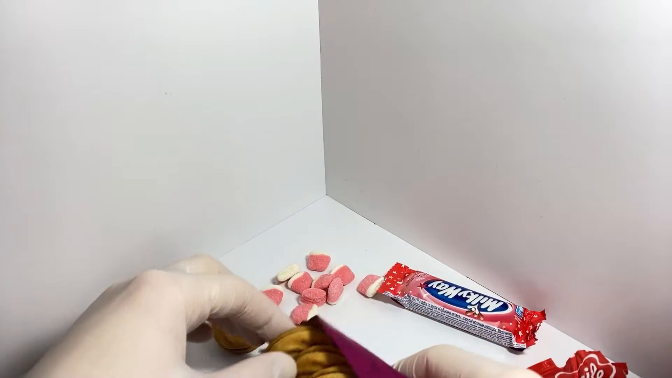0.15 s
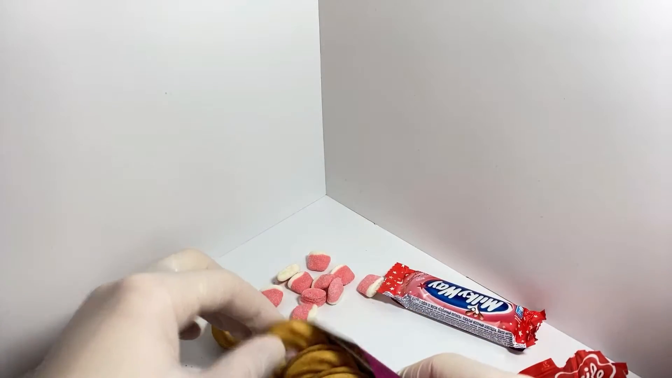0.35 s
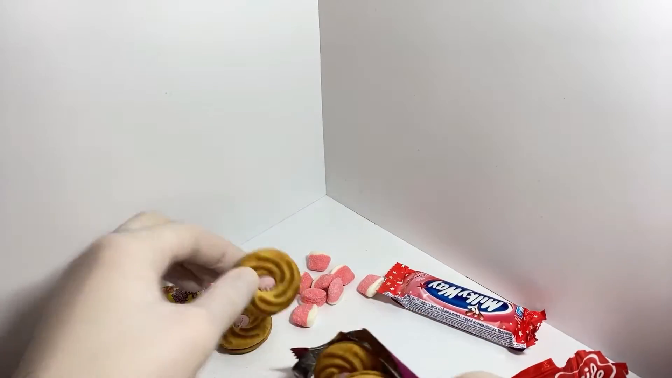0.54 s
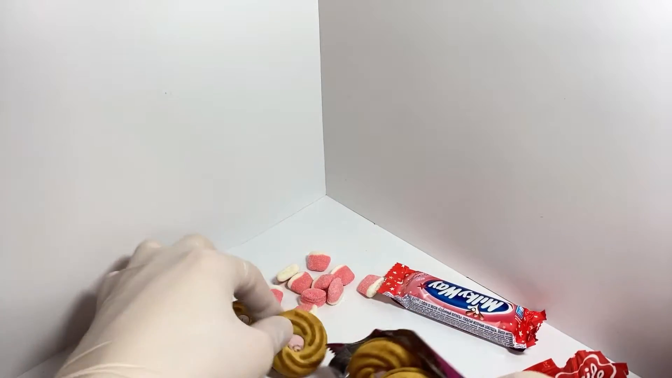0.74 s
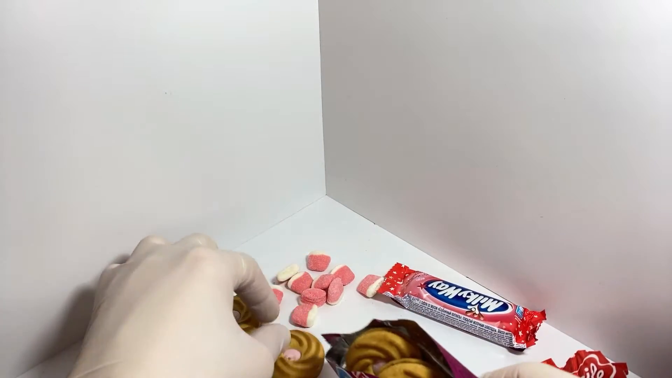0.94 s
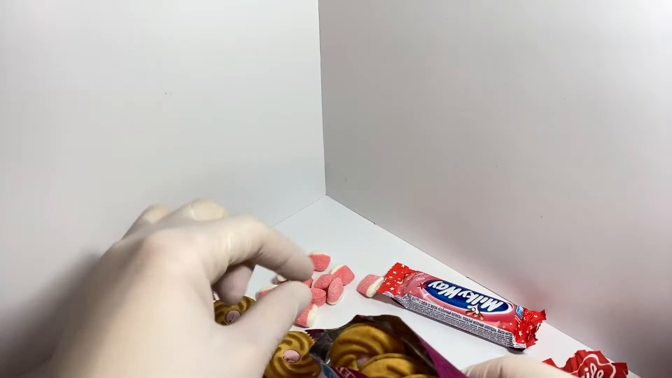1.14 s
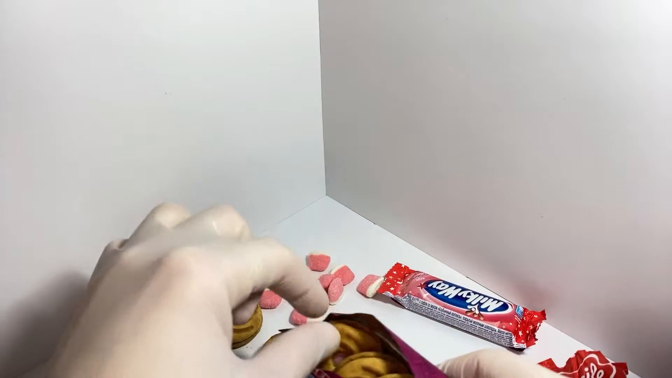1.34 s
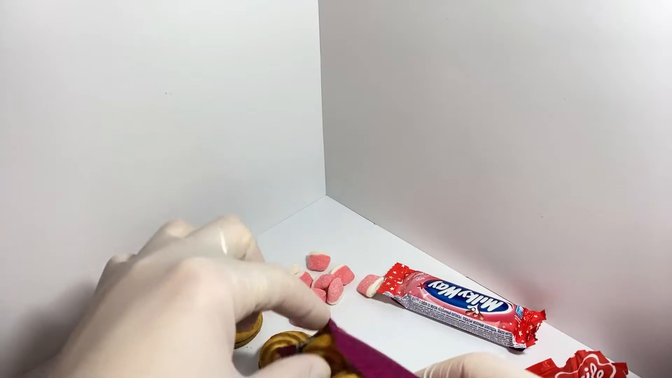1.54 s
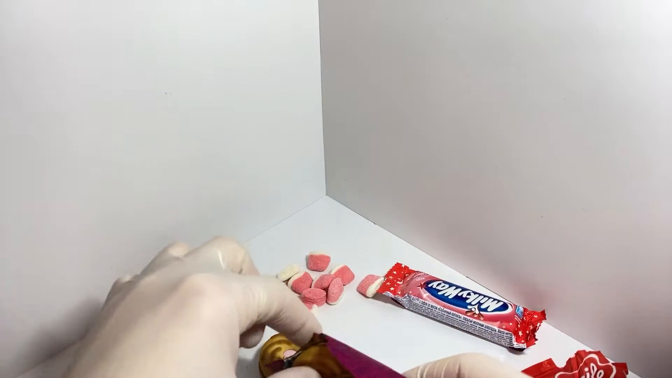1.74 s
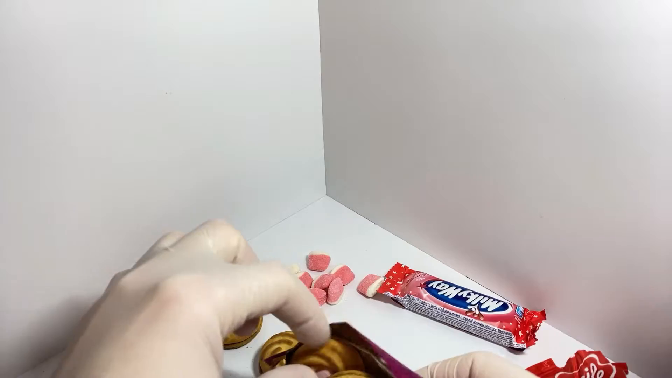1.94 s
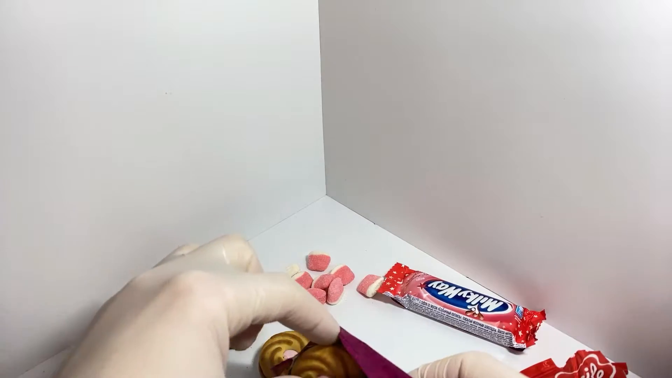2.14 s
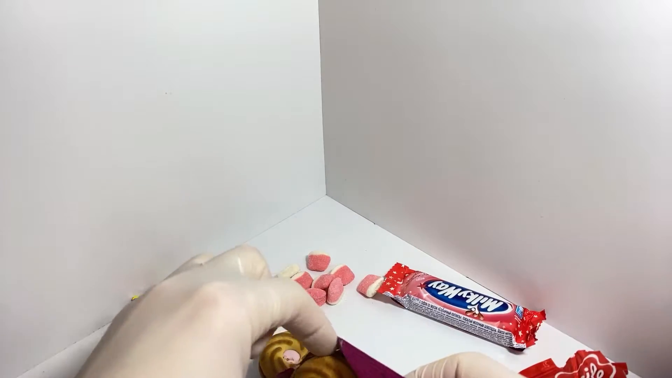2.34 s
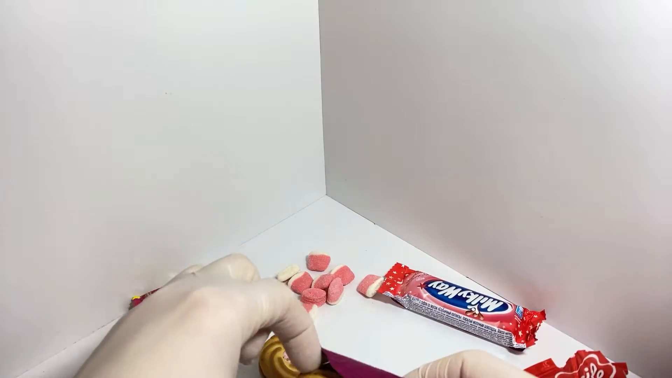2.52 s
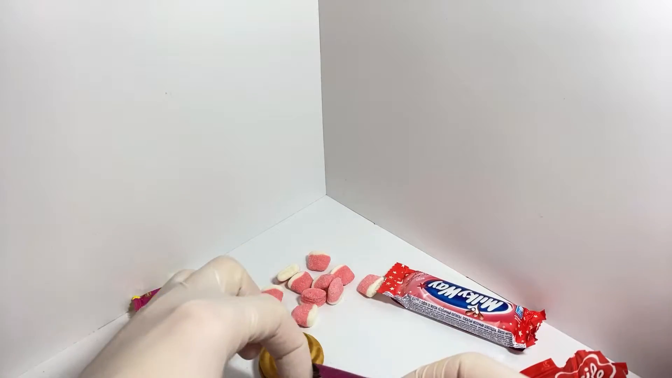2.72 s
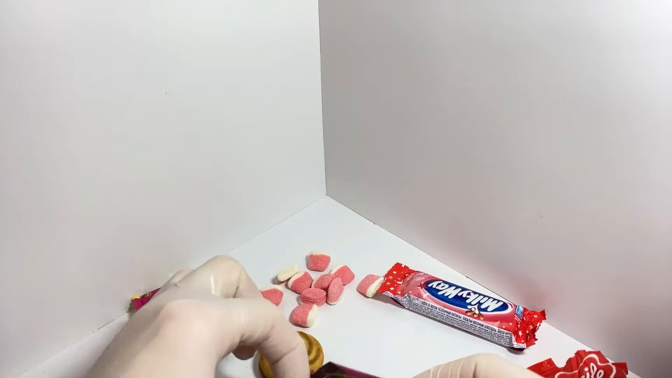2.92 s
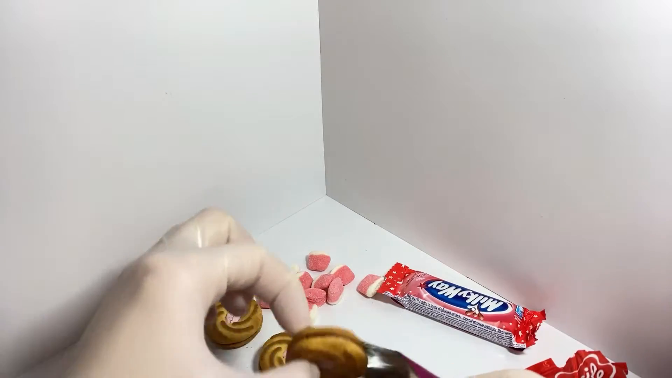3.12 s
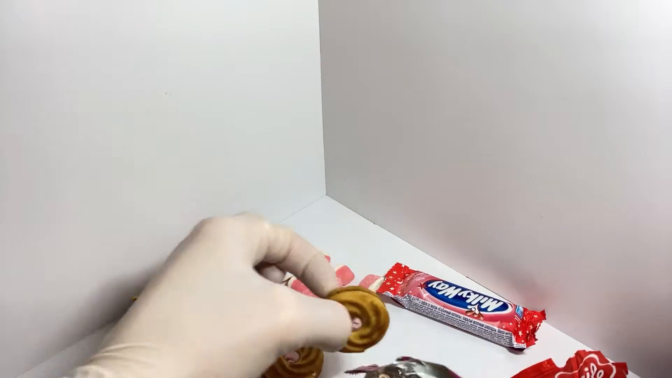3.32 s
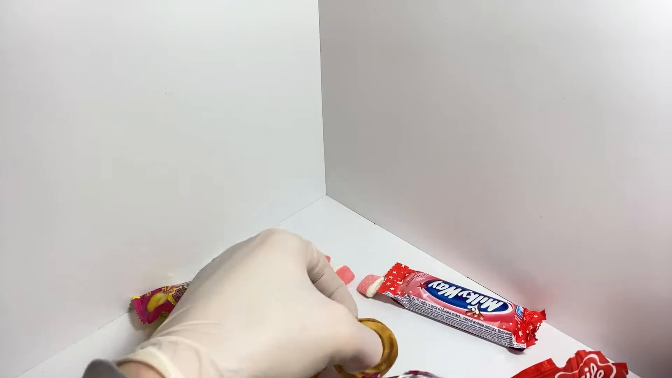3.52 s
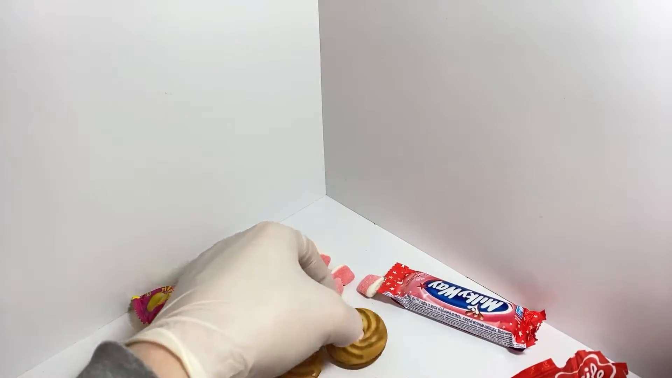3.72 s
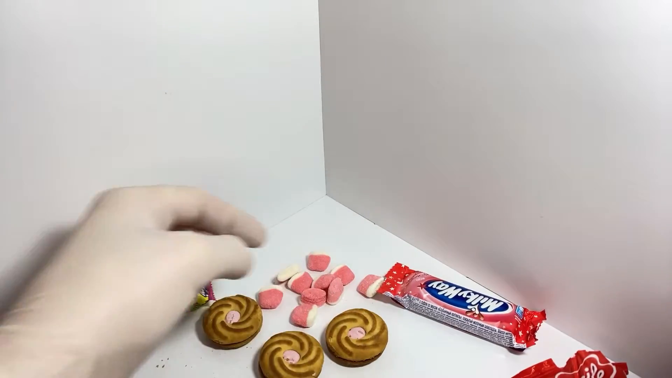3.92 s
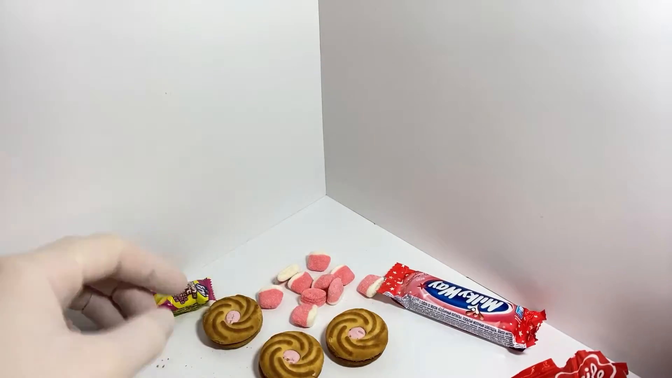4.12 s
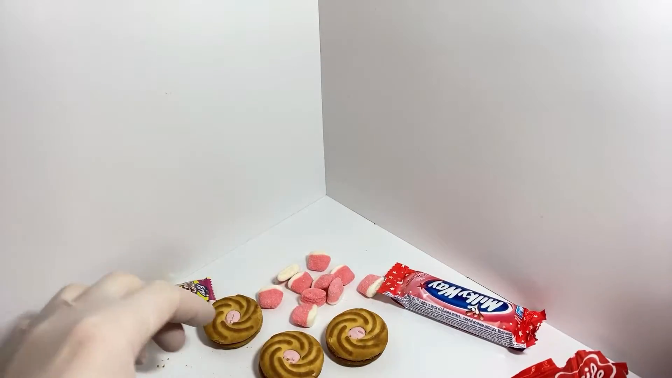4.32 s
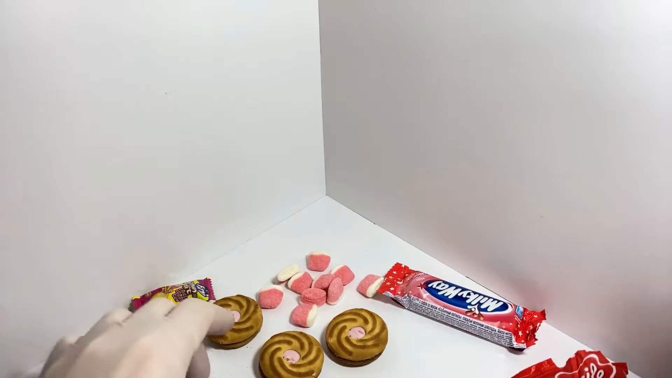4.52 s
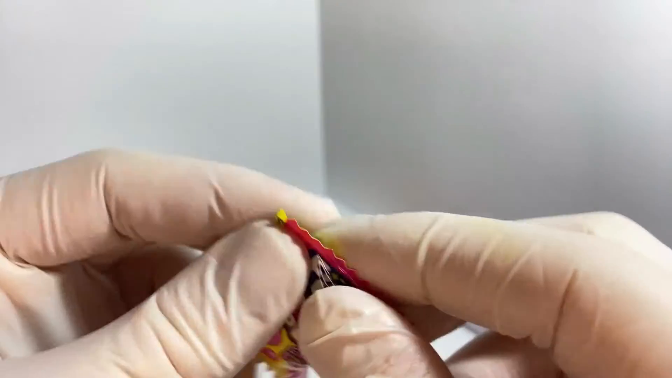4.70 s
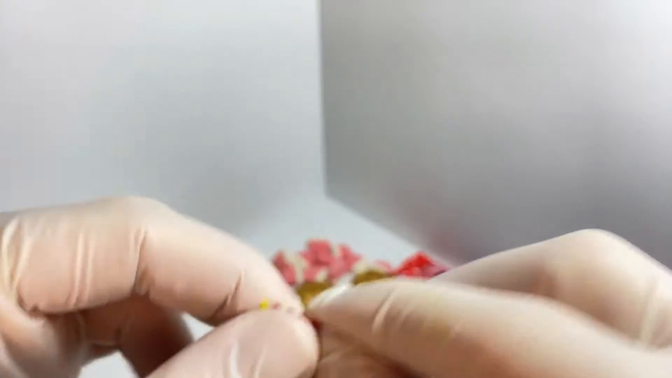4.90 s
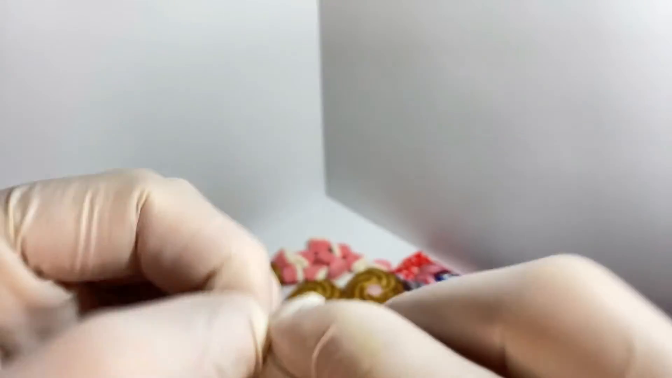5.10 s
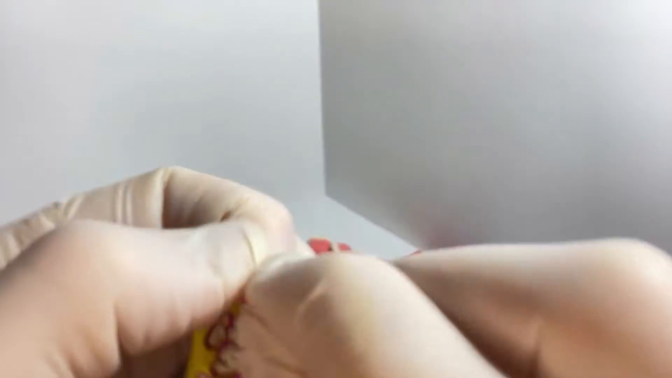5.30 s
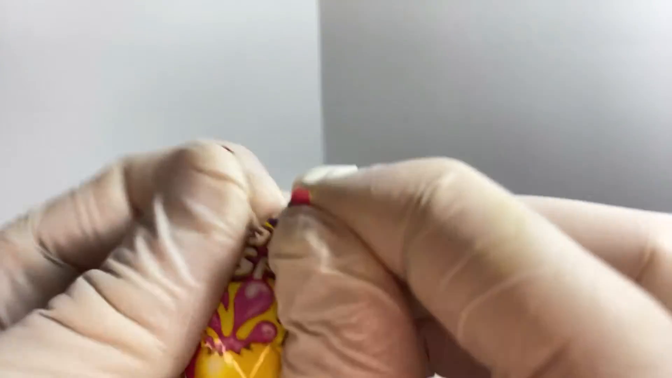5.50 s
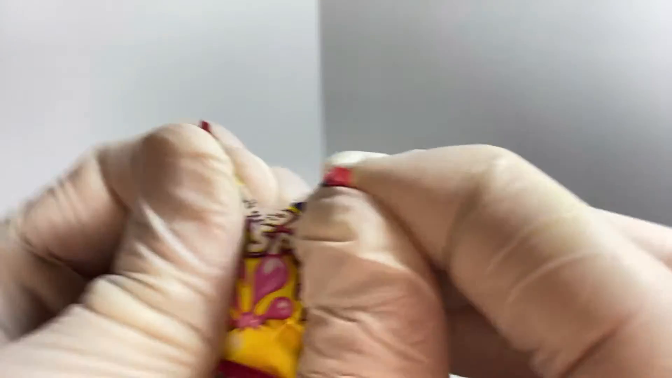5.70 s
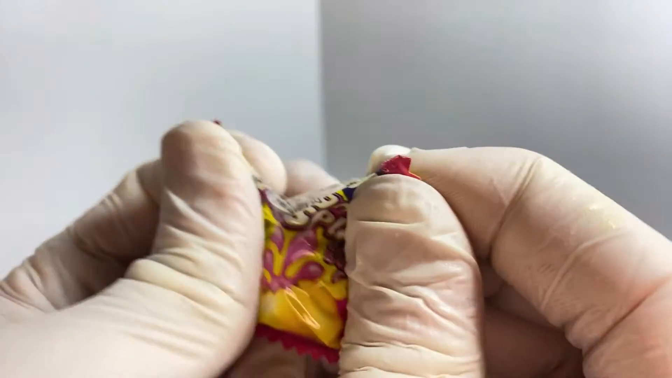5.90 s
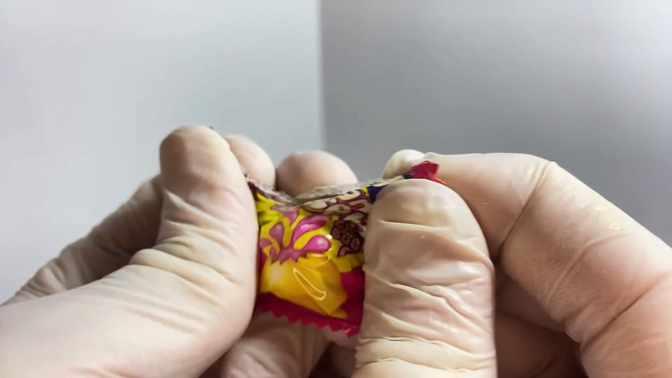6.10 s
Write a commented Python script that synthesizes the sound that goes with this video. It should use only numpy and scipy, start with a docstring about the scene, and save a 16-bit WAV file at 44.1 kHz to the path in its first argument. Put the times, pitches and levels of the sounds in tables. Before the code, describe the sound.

Irregular bursts of brittle tray crackle and biscuit scraping come first, with woody knocks as biscuits land and a second busy run of plastic snaps. A wrapped sweet taps the table, a glove brushes faintly, then a crisp foil wrapper is squeezed, briefly sings, rips and keeps crackling. Everything is close and dry-edged, with a short small-room tail over quiet steady air.

```python
"""A thin plastic tray crackles at once, close to the microphone, as gloved hands take biscuits from it.
The biscuits knock on a table; then a wrapped sweet taps it, and its foil is crinkled and torn open.
Snaps are a sharp crack and a brief ring; rubbing is random tiny slips over a smooth hiss.
Behind the hands lies a small room: its short tail on every sound, steady air and a faint hum."""
import sys
import numpy as np
from scipy import signal
from scipy.fft import rfft, irfft
from scipy.io import wavfile
from scipy.ndimage import uniform_filter1d

SR = 44100
rng = np.random.default_rng(int(sys.argv[2]) if len(sys.argv) > 2 else 0)


def wrap_up_sound(samples):
    """Save the sound to the file named by the first command line argument, as 16-bit audio."""
    columns = np.atleast_2d(samples).T
    # keep every value between -1 and 1, then stretch to whole-number steps
    tamed = np.clip(columns, -1, 1)
    steps = np.round(tamed * 32767).astype(np.int16)
    wavfile.write(sys.argv[1], SR, steps)


N = 271215

CUTOFF_HZ = 16000  # top of the room tail and of the microphone's band


def from_db(db):
    """Amplitude ratio of a level in dB."""
    return 10 ** (np.asarray(db) / 20)


def rms_one(x):
    """Scale x to an RMS of 1."""
    return x / np.sqrt(np.mean(x ** 2) + 1e-20)


def gain_in_time(rows):
    """Gain drawn through rows of (time [s], level [dB])."""
    s, db = np.transpose(rows)
    return from_db(np.interp(np.arange(N) / SR, s, db))


def at_hz(points, hz):
    """Read a table of (frequency [Hz], level [dB]) along a logarithmic frequency axis."""
    at, value = np.transpose(points)
    return np.interp(np.log(np.maximum(hz, 1)), np.log(at), value)


def causal(db):
    """Minimum-phase response with these gains: nothing sounds before its cause."""
    cepstrum = irfft(np.log(from_db(db)))
    half = len(cepstrum) // 2
    cepstrum[1:half] *= 2
    cepstrum[half + 1:] = 0
    return np.exp(rfft(cepstrum))


def coloured(x, colour, size=4096):
    """Pass x through a body with this spectrum."""
    response = irfft(causal(at_hz(colour, np.fft.rfftfreq(size, 1 / SR))))
    return signal.fftconvolve(x, response[:size // 2])[:len(x)]


def resonance(hz, centre_hz, q):
    """Response of one mode, 1 at its centre."""
    ratio = np.maximum(hz, 1) / centre_hz
    return 1 / (1 + 1j * q * (ratio - 1 / ratio))


def snaps(events, colour, crack, ring_q, t60_s, size_law, level_db, order=140, size=4096):
    """Each is one sharp crack and a quickly dying flutter, coloured by the panel that gives way.
    A larger panel rings lower and flutters longer; t60_s holds at 2 kHz."""
    out = np.zeros(N + size)
    t = np.arange(size) / SR
    hz = np.fft.rfftfreq(size, 1 / SR)
    sheen = hz ** 4 / (hz ** 4 + 7000 ** 4)  # treble shelf around 7 kHz
    fade = np.clip(2 - 4 * t / t[-1], 0, 1)
    noises = rng.standard_normal((len(events), size))
    for (s, db, ring_hz, ring_db, sheen_db), noise in zip(events, noises):
        t60 = t60_s * (2000 / ring_hz) ** size_law
        flutter = noise * from_db(-60 * (t / max(t60, 1e-3)) ** 1.4)
        force = flutter / np.linalg.norm(flutter)
        force[0] += crack
        push = rfft(force)
        # a brief blow feeds all regions of the spectrum alike
        smooth_power = uniform_filter1d(abs(push) ** 2, size=order)
        push *= causal(-10 * np.log10(smooth_power))
        panel = 1 + (from_db(ring_db) - 1) * resonance(hz, ring_hz, ring_q)
        body = causal(at_hz(colour, hz) + sheen_db * sheen)
        snap = fade * irfft(push * panel * body)
        per_5_ms = np.sqrt(SR / 200)  # levels count the snap's energy over 5 ms
        start = int(s * SR)
        out[start:start + size] += from_db(db + level_db) * snap / np.linalg.norm(snap) * per_5_ms
    return out[:N]


def faint_leads(events, lead_s, weaker_db):
    """Rows of a faint, slightly early copy of each snap."""
    return [(s - lead_s * (.5 + early), db + weaker_db, *colour)
            for (s, db, *colour), early in zip(events, rng.random(len(events)))]


def small_snaps(gain, per_s, above_db, spread_db, top_db, low_hz, high_hz, ring_db, sheen_db):
    """Rows of lesser snaps: they come at random, their level following the rubbing up to top_db."""
    rows = []
    for when, size, pitch, bright in rng.random((int(per_s * N / SR), 4)):
        db = 20 * np.log10(gain[int(when * N)]) + above_db + spread_db * (2 * size - 1)
        if db > -70:  # leave out the faintest
            ring_hz = low_hz * (high_hz / low_hz) ** pitch
            rows.append((when * N / SR, min(db, top_db), ring_hz, ring_db, sheen_db * (2 * bright - 1)))
    return rows


# Each stroke swells for this share of its length, then dies away; its ends lie this far under its peak
SWELL_SHARE, STROKE_DEPTH_DB, STROKE_ROUNDNESS = 0.52, 21.5, 1.4
GRIP_S, LET_GO_S = 0.0086, 0.037  # time constants at the two ends of a steady grip


def strokes(rows, held=()):
    """Gain of rubbing: each stroke swells and dies away, over the faint rustle of a steady grip."""
    t = np.arange(N) / SR
    power = np.full(N, 1e-14)
    for s, length, db in rows:
        away = np.maximum((s - t) / SWELL_SHARE, (t - s) / (1 - SWELL_SHARE)) / length
        near = away < 4
        power[near] += from_db(db - STROKE_DEPTH_DB * away[near] ** STROKE_ROUNDNESS) ** 2
    for start, end, db in held:
        outside = np.clip(np.maximum((start - t) / GRIP_S, (t - end) / LET_GO_S), 0, 20)
        power += (from_db(db) * np.exp(-outside)) ** 2
    return np.sqrt(power)


def uneven(gain, per_s, depth_db):
    """Fingers catch and slip, so the rubbing wavers."""
    knots = rng.standard_normal(int(per_s * N / SR) + 2)
    waver = np.interp(np.arange(N) * per_s / SR, np.arange(len(knots)), knots)
    return gain * from_db(depth_db * waver)


def rubbing(gain, colour, per_s, spread_db, ring_q, hiss, crowding=.5, count=18):
    """Tiny slips come at random, each ringing one small facet, over the smooth hiss of friction."""
    busy = np.maximum(gain / gain.max(), .02) ** crowding  # harder rubbing brings more slips
    sizes = from_db(spread_db * np.minimum(rng.exponential(1, N), 3.5)) * rng.choice([-1, 1], N)
    happens = rng.random(N) < per_s * busy / SR
    slips = sizes * happens / np.sqrt(busy)  # crowding alone does not change the loudness
    facet = rng.integers(0, count, N)
    grains = np.zeros(N)
    for k, hz in enumerate(np.geomspace(500, 14000, count)):
        b, a = signal.iirpeak(hz, ring_q, fs=SR)
        grains += signal.lfilter(b, a, slips * (facet == k) + 1e-18)
    smooth = rms_one(coloured(rng.standard_normal(N), colour))
    friction = rms_one(coloured(grains, colour)) + hiss * smooth
    return gain * rms_one(friction)


# Colour of the room's air: (frequency [Hz], relative level per Hz [dB])
AIR_COLOUR = [(24, -79), (40, -31), (91, -18), (167, -37), (220, -11), (467, -2.5), (570, 0), (680, -7.5),
              (1070, -13.5), (2100, -18.5), (2570, -17.5), (3930, -24), (4680, -19.5), (14500, -34),
              (16000, -53)]
AIR_DB = -58.5  # RMS
HUM_HZ, HUM_DB = 124, -88  # RMS


def background():
    """Steady room air, as coloured noise, and a faint hum, as one sine."""
    air = from_db(AIR_DB) * rms_one(coloured(rng.standard_normal(N), AIR_COLOUR))
    hum = rms_one(np.sin(2 * np.pi * HUM_HZ * np.arange(N) / SR))
    return air + from_db(HUM_DB) * hum


# Colour of biscuits scraping on the tray and on each other, used for the glove ticks too:
# (frequency [Hz], relative level per Hz [dB])
SCRAPE_COLOUR = [(59, -127), (100, -44), (513, -3), (1030, -1), (1250, -6.5), (1550, -1), (2220, -2.5),
                 (2690, -0.5), (4470, -9), (5770, -3), (8280, -7.5), (15000, -20), (16000, -23)]


def glove_ticks():
    """The moving gloves tick faintly all the time: sparse slips at a steady level."""
    ticks = rubbing(np.ones(N), SCRAPE_COLOUR, per_s=220, spread_db=4.0, ring_q=1.5, hiss=.2)
    return from_db(-68) * ticks


# Loudest tray snaps: (time [s], level over 5 ms [dB], ring [Hz], ring gain [dB], treble sheen [dB])
TRAY_SNAPS = [(0.0325, -33, 7300, 9.5, 3), (0.1192, -39, 1470, 20.5, -2), (0.1439, -33.5, 5550, 5, 6),
              (0.2056, -26, 770, 10, -10), (0.2165, -16, 2590, 6, 4.5), (0.2289, -25.5, 2320, 6, 1),
              (0.2654, -34, 1390, 11, -3), (0.3186, -33, 600, 4, 1), (0.3288, -20, 8150, 16, -5),
              (0.3743, -30, 1650, 11, -7), (0.5114, -23.5, 930, 9, 7.5), (0.6301, -39, 6660, 4, 5),
              (0.697, -33.5, 1200, 9.5, -4.5), (1.5244, -24, 1950, 8, -1), (1.5539, -36.5, 2650, 14, 9),
              (1.6499, -29.5, 1640, 10.5, 1), (1.8119, -22.5, 1530, 12.5, 6.5),
              (1.8241, -31.5, 1810, 11, -2), (1.9278, -28, 4870, 2.5, -2.5), (2.1316, -30.5, 1520, 12, 11),
              (2.1495, -22.5, 1670, 9.5, -4), (2.1977, -20.5, 7000, 1.5, 3.5), (2.2084, -34, 453, 20, -7),
              (2.2157, -28, 1880, 7, -12), (2.2586, -31, 2950, 16, -2), (2.2632, -18, 700, 11, -4),
              (2.2991, -27, 1390, 8, 3), (2.4621, -21, 6500, 3.5, 2), (2.4808, -16.5, 3860, 2, 9),
              (2.4983, -26, 2740, 6, -8), (2.5498, -28, 750, 17, -15), (2.5563, -24, 3560, 6, 4),
              (2.6245, -26.5, 758, 4, 4.5), (2.7044, -31.5, 950, 12.5, -25), (2.7923, -23.5, 2400, 28, 5.5),
              (2.875, -28.5, 1770, 8, -11), (3.0218, -28.5, 2540, 9, -9), (3.0286, -22, 1350, 20.5, 3),
              (3.0433, -18, 2400, 14, 5), (3.0632, -28, 1150, 25, -3), (3.3036, -24.5, 2550, 6, -9),
              (3.3095, -22, 350, 10, -9), (3.3132, -18, 3500, 7.5, -1)]
# What the thin plastic radiates: (frequency [Hz], relative level [dB])
TRAY_COLOUR = [(60, -82), (150, -41.5), (220, -23.5), (400, -5), (700, -3), (1200, -2.5), (2200, 0),
               (4000, -4.5), (6800, -1), (9500, -8), (12000, -17.5), (15000, -22)]
# Strokes of rubbing, in the tray and, at 3.7 s, of sliding biscuits:
# (peak time [s], length [s], level [dB])
RUB_STROKES = [(0.06, 0.13, -46.5), (0.18, 0.18, -47), (0.31, 0.25, -42), (0.485, 0.17, -25.5),
               (0.89, 0.2, -50.5), (1.0, 0.066, -43), (1.55, 0.22, -44.5), (1.71, 0.31, -41.5),
               (2.048, 0.078, -41), (2.37, 0.14, -50), (2.48, 0.14, -34.5), (2.61, 0.23, -48),
               (2.84, 0.11, -45), (2.99, 0.1, -41), (3.165, 0.097, -33.5), (3.23, 0.15, -23.5),
               (3.7, 0.033, -45.5)]
# Faint rustle while the tray is held: (start time [s], end time [s], level [dB])
TRAY_HELD = [(0.029, 0.742, -54), (1.477, 3.36, -52)]


def tray():
    """The thin tray buckles under the fingers while biscuits scrape out of it; later biscuits slide."""
    effort = strokes(RUB_STROKES, TRAY_HELD)
    leads = faint_leads(TRAY_SNAPS, lead_s=.003, weaker_db=-21)
    buckles = snaps(TRAY_SNAPS + leads, TRAY_COLOUR,
                    crack=0.7, ring_q=4.5, t60_s=0.016, size_law=0.27, level_db=0.0)
    scrape = rubbing(uneven(effort, per_s=90, depth_db=1.8), SCRAPE_COLOUR,
                     per_s=9000, spread_db=6.0, ring_q=2.4, hiss=1.0, crowding=0.9)
    lesser = small_snaps(effort, per_s=44, above_db=-1, spread_db=5, top_db=-40.5,
                         low_hz=900, high_hz=5950, ring_db=9, sheen_db=3)
    ticks = snaps(lesser, TRAY_COLOUR, crack=0.45, ring_q=5.3, t60_s=0.016, size_law=0.25, level_db=3.0)
    return buckles + scrape + ticks


# Tail of the small room: (band centre [Hz], t60 [s], level before the band filter [dB])
ROOM = [(334, 0.39, -9), (900, 0.32, -15), (2580, 0.17, -15.5), (6660, 0.12, -17.5), (13000, 0.22, -23)]


def room(x, build_up_s, size=22050):
    """Diffuse tail of a small room: bands of decaying noise, each with its own decay time."""
    t = np.arange(size) / SR
    tail = np.zeros(size)
    centres = np.array([row[0] for row in ROOM])
    edges = np.r_[150, np.sqrt(centres[1:] * centres[:-1]), CUTOFF_HZ]
    for (hz, t60, db), low, high in zip(ROOM, edges, edges[1:]):
        build_up = 1 - np.exp(-t / build_up_s)
        echoes = rng.standard_normal(size) * from_db(-60 * t / t60) * build_up
        band = signal.butter(2, [low, high], "band", fs=SR, output="sos")
        tail += from_db(db) * signal.sosfilt(band, echoes / np.linalg.norm(echoes))
    return signal.fftconvolve(x, tail)[:N]


# Biscuits meeting the table: (time [s], level over 5 ms [dB], ring [Hz], ring gain [dB], treble sheen [dB])
BISCUIT_KNOCKS = [(0.8236, -19, 1780, 9, -3), (0.9257, -28.5, 593, 16, -6), (0.9345, -34, 514, 12, -1),
                  (0.995, -24, 500, 4.6, -8), (1.0141, -23, 570, 23, -6), (1.0301, -24.5, 1090, 4.8, 0),
                  (3.5837, -33.5, 313, 12, 6), (3.7563, -32, 1420, 7.7, -2), (3.7689, -27.5, 830, 11, 8),
                  (3.7765, -33.5, 900, 5.6, 4), (3.7838, -29, 1000, 9, 10)]
# What the table radiates: (frequency [Hz], relative level [dB])
TABLE_COLOUR = [(60, -66), (150, -30), (220, -22.5), (300, 0), (550, 0), (900, -3.5), (1400, -11.5),
                (2200, -23), (4000, -25), (8000, -32.5), (15000, -49)]
# Slides on the table: (peak time [s], length [s], level [dB])
BISCUIT_SLIDES = [(0.843, 0.036, -35.5), (0.9, 0.17, -42.5), (1.02, 0.12, -36.5), (3.71, 0.097, -44.5),
                  (3.8, 0.13, -40)]
# Low modes of the table and its corner: (frequency [Hz], t60 [s], relative level [dB])
TABLE_MODES = [(313, 0.34, -30), (574, 0.3, -17.5)]


def biscuits():
    """Biscuits land on the table, rock and slide a little; the contact rings the table's low modes."""
    knocks = snaps(BISCUIT_KNOCKS, TABLE_COLOUR,
                   crack=0.53, ring_q=8.2, t60_s=0.02, size_law=0.13, level_db=0.0, order=26)
    slide = rubbing(strokes(BISCUIT_SLIDES), TABLE_COLOUR, per_s=970, spread_db=5.5, ring_q=2.0, hiss=0.7)
    contact = knocks + slide
    t = np.arange(SR // 2) / SR
    rings = sum(from_db(db - 60 * t / t60) * np.sin(2 * np.pi * hz * t) for hz, t60, db in TABLE_MODES)
    return contact + from_db(-50.0) * signal.fftconvolve(contact, rings)[:N]


# The sweet meeting the table, before the shared level_db:
# (time [s], level over 5 ms [dB], ring [Hz], ring gain [dB], treble sheen [dB])
SWEET_TAPS = [(4.0528, -25.5, 1980, 9.5, -12.5), (4.0542, -26.5, 1280, 20, -9)]


def sweet_taps():
    """A wrapped sweet taps the table: short cracks with a narrow ring, in the tray's colour."""
    return snaps(SWEET_TAPS, TRAY_COLOUR,
                 crack=0.68, ring_q=11.4, t60_s=0.0095, size_law=0.38, level_db=0.5, order=40)


# A glove brushes over the table: (time [s], level [dB])
GLOVE_BRUSH = [(4.2, -88), (4.3, -67), (4.39, -56.5), (4.48, -67), (4.6, -74), (4.73, -79)]
# Colour of that brush: (frequency [Hz], relative level per Hz [dB])
GLOVE_COLOUR = [(200, -32), (1500, -8), (4000, -18), (8000, 1), (11000, -10), (16000, -17)]


def glove_brush():
    """Soft friction of rubber on the table top: sparse slips over hiss."""
    return rubbing(gain_in_time(GLOVE_BRUSH), GLOVE_COLOUR, per_s=900, spread_db=5.0, ring_q=2.0, hiss=.7)


# A tick during the glove's brush at 4.424 s, then foil creases snapping over, before the shared level_db:
# (time [s], level over 5 ms [dB], ring [Hz], ring gain [dB], treble sheen [dB])
WRAPPER_SNAPS = [(4.424, -49, 3330, 13, -10), (4.7469, -32, 1700, 9, 1), (4.7747, -27, 1820, 8.9, -15.5),
                 (4.7827, -28.5, 5200, 6.1, -4), (4.7922, -33, 1920, 7, -13), (4.8372, -28, 700, 8, -4),
                 (4.854, -28, 750, 8, 0), (4.862, -20.5, 3560, 13.5, 5), (4.8795, -33, 5610, 4, -15),
                 (4.8927, -26, 3650, 6, -18), (4.9237, -17, 900, 13, 2.5), (4.935, -16.5, 2470, 6.3, 0),
                 (4.946, -24, 1760, 18, -11), (4.9684, -28, 5040, 5, 14), (4.9851, -14, 7300, 2.4, -4),
                 (4.9985, -26.5, 1330, 3, -12), (5.0233, -27.5, 3810, 18, 15),
                 (5.0886, -18, 4050, 4.6, -10.5), (5.123, -14.5, 6800, 13.6, -6),
                 (5.1556, -27.5, 2580, 6.6, -1), (5.1634, -28, 2380, 9, 2), (5.1731, -26, 6810, 5.4, -1),
                 (5.2147, -37.5, 1940, 16, -2), (5.2714, -34.5, 1880, 10, 0), (5.3086, -28.5, 2090, 10, 15),
                 (5.3329, -21.5, 5610, 9, 13), (5.3495, -16, 5450, 9, 11), (5.357, -22, 1840, 3, 5),
                 (5.3736, -18.5, 5100, 16, 2), (5.3896, -19, 2080, 16, 1), (5.4088, -19, 1280, 17, 3),
                 (5.4155, -14, 810, 8.3, 1), (5.4185, -20, 2100, 4, -15), (5.4347, -20.5, 2120, 21, 2),
                 (5.4858, -15, 1960, 9.2, 0), (5.5099, -20, 2110, 16, 5), (5.5225, -17, 7420, 5.4, -2),
                 (5.5304, -21, 2380, 16, 6), (5.5453, -28.5, 2820, 8, 4), (5.5772, -20, 4430, 10, 2),
                 (5.5884, -29, 2710, 7, 15), (5.6602, -27, 8100, 9, -7.5), (5.6677, -30, 5070, 9.9, 5),
                 (5.6864, -24, 2520, 18, 10), (5.7142, -32.5, 2430, 16, -1), (5.7469, -27, 1310, 21, 13),
                 (5.7573, -35, 3010, 16, 1), (5.7866, -15.5, 6960, 8, -10), (5.8095, -15, 7300, 5.6, 4),
                 (5.8165, -22.5, 1650, 8, 18), (5.8192, -23.5, 4430, 12, -2), (5.8288, -21, 5450, 10, 6),
                 (5.8547, -20.5, 3230, 6.8, -2), (5.8734, -22, 2230, 4, 4), (5.8836, -18, 3880, 17.5, -1),
                 (5.8905, -27.5, 3730, 5, -10), (5.9362, -32.5, 5230, 8, 3), (6.0017, -21, 5160, 22, 20),
                 (6.0092, -23.5, 4000, 6.2, 4), (6.0579, -27, 5550, 7.8, 15), (6.1006, -28, 7900, 19, -15),
                 (6.1411, -19.5, 7400, 12.5, 11)]
# What the wrapper radiates: (frequency [Hz], relative level [dB])
WRAPPER_COLOUR = [(60, -74), (150, -65), (220, -35), (400, -19), (800, -16), (1400, -13), (2300, -7.5),
                  (3600, -6), (5200, -2), (7000, 2.5), (9000, -4.5), (12000, -10), (15000, -16.5)]
# Squeezes of the wrapper: (peak time [s], length [s], level [dB])
WRAPPER_SQUEEZES = [(4.762, 0.033, -37.5), (4.895, .2, -33), (5.01, 0.13, -38.5), (5.145, 0.17, -47),
                    (5.345, 0.088, -31), (5.41, 0.073, -30.5), (5.48, .06, -40), (5.545, 0.23, -44),
                    (5.7, 0.21, -47), (5.835, 0.18, -41.5), (6.015, 0.066, -42.5)]
# Faint rustle while the wrapper is held: (start time [s], end time [s], level [dB])
WRAPPER_HELD = [(4.75, 6.15, -61.5)]
# Colour of crinkling foil: (frequency [Hz], relative level per Hz [dB])
FOIL_COLOUR = [(60, -60), (150, -64), (300, -14.5), (600, -10.5), (1300, -9), (2300, -7.5), (3300, -5.5),
               (4300, -2.5), (5400, -5), (7000, -5.5), (9000, -6), (12000, -12), (16000, -16)]


def wrapper():
    """After one faint tick, foil creases snap over, large and small, while the squeezed wrapper crinkles."""
    effort = strokes(WRAPPER_SQUEEZES, WRAPPER_HELD)
    leads = faint_leads(WRAPPER_SNAPS, lead_s=.003, weaker_db=-21)
    main_snaps = snaps(WRAPPER_SNAPS + leads, WRAPPER_COLOUR,
                       crack=0.6, ring_q=6.6, t60_s=.012, size_law=0.19, level_db=-0.5)
    crinkle = rubbing(uneven(effort, per_s=110, depth_db=2.5), FOIL_COLOUR,
                      per_s=3600, spread_db=4.0, ring_q=4.2, hiss=0.48, crowding=.5)
    lesser = small_snaps(effort, per_s=28, above_db=5.5, spread_db=6.5, top_db=-34,
                         low_hz=1700, high_hz=7000, ring_db=14, sheen_db=3)
    ticks = snaps(lesser, WRAPPER_COLOUR, crack=0.53, ring_q=8.9, t60_s=0.015, size_law=.15, level_db=-3.0)
    return main_snaps + ticks + crinkle


# Singing of the foil pulled taut: (time [s], level [dB])
TAUT_LEVEL = [(5.21, -100), (5.25, -39.5), (5.31, -58), (5.35, -47), (5.41, -29.5), (5.45, -38),
              (5.52, -47), (5.57, -56), (5.62, -100)]
# Modes of the taut foil: (frequency [Hz], width [Hz], relative level [dB])
TAUT_MODES = [(2090, 230, 5), (2630, 160, -18), (4430, 360, -2), (5200, 600, -3)]


def taut_foil():
    """Tiny random breaks pluck the stretched wrapper, which sings at its own modes."""
    plucks = rng.standard_normal(N) * (rng.random(N) < 900 / SR) + 1e-18  # 900 a second
    out = np.zeros(N)
    for hz, width_hz, db in TAUT_MODES:
        b, a = signal.iirpeak(hz, hz / width_hz, fs=SR)
        out += from_db(db) * rms_one(signal.lfilter(b, a, plucks))
    return gain_in_time(TAUT_LEVEL) * rms_one(out)


# The tear runs through the foil: (time [s], level [dB])
TEAR_LEVEL = [(5.30, -100), (5.325, -27), (5.345, -31), (5.38, -23), (5.42, -35), (5.44, -51), (5.47, -100)]
# Colour of the tear: (frequency [Hz], relative level per Hz [dB])
TEAR_COLOUR = [(150, -49), (500, -27), (1500, -12), (3300, -13), (5500, -2), (8000, -2), (12000, -11),
               (16000, -17)]


def tear():
    """The tear is a dense run of tiny breaks in the foil."""
    return rubbing(gain_in_time(TEAR_LEVEL), TEAR_COLOUR,
                   per_s=2300, spread_db=6.5, ring_q=1.6, hiss=0.34, crowding=0.3)


def scene():
    """Everything the hands do, with its room tail, over the background."""
    gloves = glove_ticks() + glove_brush()
    sweet = sweet_taps() + wrapper() + taut_foil() + tear()
    handling = gloves + tray() + biscuits() + sweet
    return (handling + room(handling, build_up_s=0.014) + background())[None]


def record(dry):
    """At the microphone the highest peaks are rounded off, the bass and the top are cut."""
    ceiling = .58  # full scale is 1
    rounded = dry / (1 + (dry / ceiling) ** 6) ** (1 / 6)
    thin = signal.sosfilt(signal.butter(1, 130, "high", fs=SR, output="sos"), rounded)
    return signal.sosfilt(signal.ellip(10, .2, 80, CUTOFF_HZ, fs=SR, output="sos"), thin)


dry = scene()
out = record(dry)
wrap_up_sound(out)
```